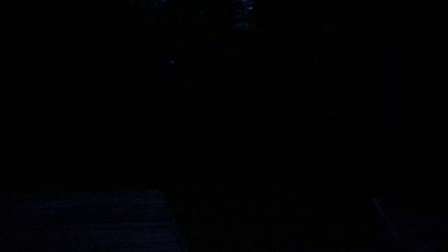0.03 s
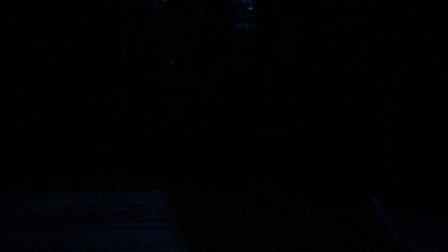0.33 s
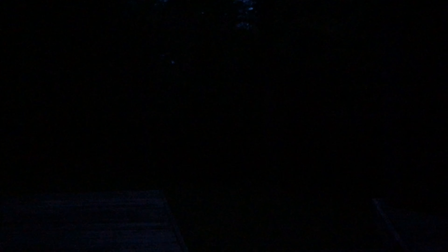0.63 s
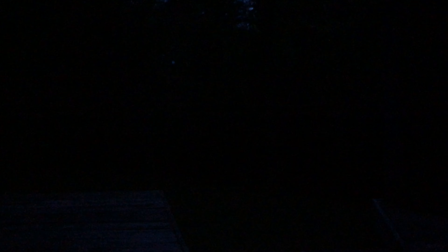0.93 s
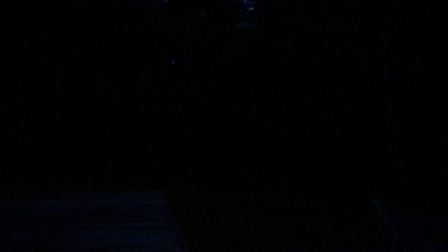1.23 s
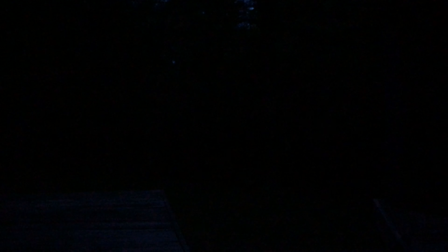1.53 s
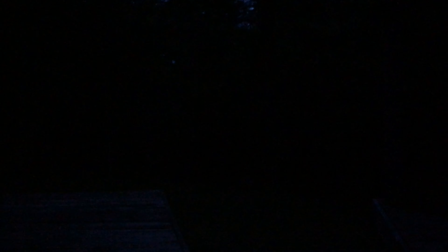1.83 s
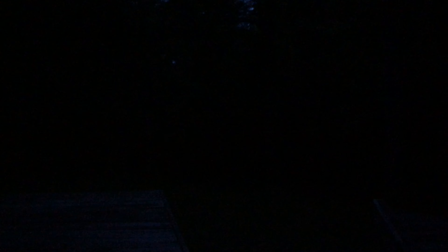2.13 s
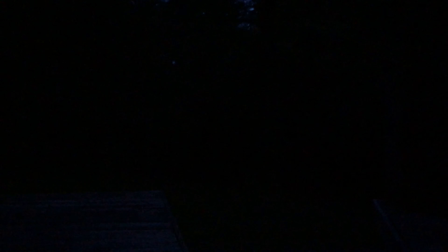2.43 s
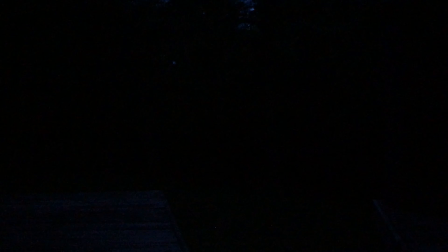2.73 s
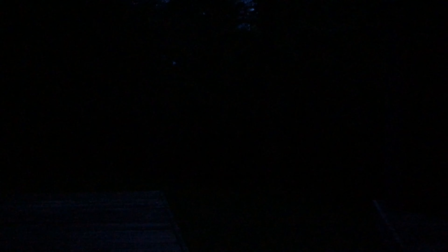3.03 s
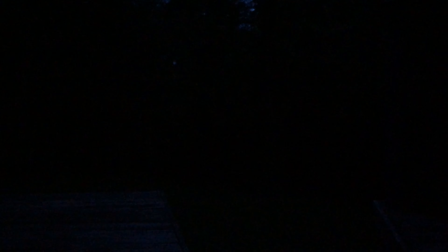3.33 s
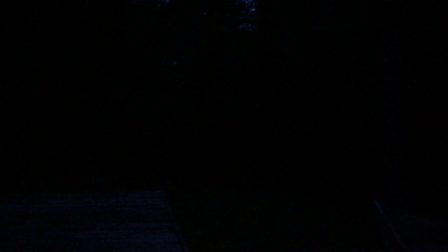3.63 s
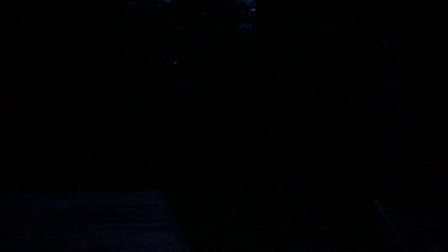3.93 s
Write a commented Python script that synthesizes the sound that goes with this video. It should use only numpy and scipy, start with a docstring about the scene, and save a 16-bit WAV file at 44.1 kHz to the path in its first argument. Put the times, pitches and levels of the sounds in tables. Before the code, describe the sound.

Many small frogs peep in high, overlapping rising whistles around a pond at night.

```python
"""Frog pond at night

A dense chorus of small frogs peeps. Each peep is a short rising whistle: the vocal sac radiates
the second harmonic of the larynx, the others stay faint. Trees scatter the calls. Behind them lie
faint rumble, hum and hiss, two far falling whistles and, near the end, one small metallic tick."""
import sys
import numpy as np
from scipy import signal
from scipy.fft import rfft, irfft
from scipy.io import wavfile
from scipy.ndimage import uniform_filter1d

SR = 44100
rng = np.random.default_rng(int(sys.argv[2]) if len(sys.argv) > 2 else 0)


def dump(signal):
    """Clip the signal to [-1, 1] and save it as 16-bit WAV at the path in sys.argv[1]."""
    limited = np.clip(np.atleast_2d(signal).T, -1, 1)
    pcm = np.round(limited * 32767).astype(np.int16)
    wavfile.write(sys.argv[1], SR, pcm)


N = 176400


def undb(db):
    """Decibels to gain."""
    return 10 ** (np.asarray(db) / 20)


def unit(x):
    """Scale to rms 1."""
    return x / np.sqrt(np.mean(x ** 2))


def add(out, start_s, x):
    """Mix x into out at start_s."""
    i = int(round(start_s * SR))
    a, b = max(i, 0), min(i + len(x), len(out))
    if b > a:
        out[a:b] += x[a - i:b - i]


def wander(rate_hz):
    """Smoothed random steps, spread near 1."""
    hold = int(SR / rate_hz)
    steps = rng.standard_normal(2000)[np.arange(N) // hold]
    return 1.3 * uniform_filter1d(uniform_filter1d(steps, hold), hold)


def noise(spectrum):
    """Noise of rms 1, shaped by (f/Hz, level/dB) points."""
    hz, db = np.array(spectrum).T
    bins_hz = np.maximum(np.arange(N // 2 + 1) * SR / N, 1)
    gain = undb(np.interp(np.log(bins_hz), np.log(hz), db))
    return unit(irfft(rfft(rng.standard_normal(N)) * gain, N))


# Night air spectrum: f/Hz, relative density/dB
AIR_SPECTRUM = [(20, -24.5), (32, -9.5), (45, 2.5), (60, -3), (90, 5.5), (135, -1), (200, 1), (270, -5),
                (400, -5.5), (580, -10), (740, -4.5), (1200, -12), (2000, -16.5), (3500, -25.5),
                (7000, -27.5), (15500, -31.5)]


def night_air(air_db=-66, hum_db=-70, hum_hz=112):
    """Faint rumble and hiss, with a low hum wavering in pitch and level."""
    pitch_hz = hum_hz * (1 + .02 * wander(14))
    hum = np.sqrt(2) * np.sin(2 * np.pi * np.cumsum(pitch_hz) / SR)
    air = undb(air_db) * noise(AIR_SPECTRUM)
    return air + undb(hum_db + 2 * wander(41)) * hum


def peep(length_s, mid_hz, harmonics_db, attack_s=.0065, rise_hz_per_s=2124, colour_db=0):
    """Gliding whistle on larynx harmonic 2, rasped by sac flutter; colour_db shifts the others."""
    release_s, bend_hz_per_s2 = .0086, -6000
    rasp_db, rasp_hz = -34.5, 444
    t = np.arange(int(length_s * SR)) / SR
    from_mid_s = t - length_s / 2
    waver = np.interp(t / length_s, np.linspace(0, 1, 24), rng.standard_normal(24))
    lowpass = signal.butter(4, rasp_hz, fs=SR, output="sos")
    flutter = unit(signal.sosfilt(lowpass, rng.standard_normal(SR // 5)))[:len(t)]
    glide_hz = mid_hz + rise_hz_per_s * from_mid_s + bend_hz_per_s2 * from_mid_s ** 2
    larynx_hz = glide_hz / 2 * (1 + .0012 * waver)
    phase = 2 * np.pi * (np.cumsum(larynx_hz) / SR + rng.random())
    attack = np.sin(np.pi / 2 * np.clip(t / attack_s, 0, 1))
    release = np.sin(np.pi / 2 * np.clip((length_s - t) / release_s, 0, 1))
    shift_db = colour_db + 2 * rng.standard_normal(len(harmonics_db))  # no two calls alike
    shift_db[1] = 0
    voice = sum(undb(db) * np.sin(k * phase) for k, db in enumerate(shift_db + harmonics_db, 1))
    return attack * release * (1 + undb(rasp_db) * flutter) * voice


def trees(call, echo_db, t60_s=.52, delay_s=.004, count=160):
    """Direct call plus its own scatter of echoes off trunks and banks."""
    spread, strength = rng.random(count), rng.standard_normal(count)
    lag_s = .5 * spread ** 2
    echoes = strength * undb(-60 * lag_s / t60_s) * np.sqrt(spread)
    response = np.zeros(SR * 3 // 4)
    taps = np.clip((delay_s + lag_s) * SR, 1, len(response) - 1).astype(int)
    response[taps] = undb(echo_db) * echoes / np.linalg.norm(echoes)
    response[0] = 1
    return signal.fftconvolve(call, response)


# Near larynx harmonics, first upward: relative level/dB
NEAR_LARYNX_DB = [-46.5, 0, -36, -38.5, -50.5, -56, -51.5, -44, -58.5, -68]
# Near peeps: t/s, length/s, mid f/Hz, rise/(Hz/s), relative level/dB, colour/dB, attack/s
NEAR_PEEPS = [(0,0.083,2850,2190,-32.5,2,0.0083), (.094,.08,2889,2430,-35,-9.5,0.0063),
              (.095,0.054,2817,3420,-33,-6,.006), (0.141,0.11,2702,2400,-42.5,-0.5,0.024),
              (0.185,0.091,2960,1410,-35.5,4.5,0.0052), (0.264,0.083,2920,1416,-36,1.5,0.013),
              (0.368,0.078,3032,2650,-33.5,8.5,0.015), (0.489,0.075,3161,2790,-34.5,-2.5,0.04),
              (.624,0.067,2830,2110,-37.5,0,0.0024), (.625,0.058,2972,1850,-34.5,-4.5,0.0035),
              (0.774,0.068,2917,2620,-31,-1,.025), (0.796,0.087,2861,2370,-35.5,4.5,0.049),
              (0.819,.065,2850,2750,-37.5,1.5,0.019), (0.928,0.079,2890,3760,-33.5,-3,.012),
              (1.024,0.083,3022,2350,-35.5,9.5,0.01), (1.055,0.086,2900,2750,-37.5,4.5,0.012),
              (1.115,0.093,2728,2670,-41,4.5,0.019), (1.182,0.062,3177,2990,-33.5,-1.5,0.013),
              (1.326,0.089,2947,2330,-34.5,-2.5,0.027), (1.39,.095,2955,2560,-37.5,-10,.02),
              (1.404,.08,3130,2370,-46.5,-9.5,0.021), (1.607,0.081,2972,2560,-34,7,.015),
              (1.699,0.061,2839,2190,-32,4,0.02), (1.778,0.084,2870,1980,-42,-6,0.0044),
              (1.825,0.096,2920,2870,-42,8.5,0.0037), (1.9,0.0743,2838,1980,-40.5,1,0.017),
              (1.977,0.063,3180,3200,-34,-2.5,0.025), (1.99,.082,2938,2630,-31,-1,0.039),
              (2.046,0.08,2688,1780,-41.5,4.5,0.017), (2.087,0.086,2945,1800,-39.5,-1.5,.004),
              (2.203,0.088,2977,2390,-32.5,6,0.024), (2.334,0.094,3014,2470,-40.5,6.5,.025),
              (2.492,.08,2963,3040,-39.5,-5,0.024), (2.556,.08,3157,2600,-49.5,-5,.02),
              (2.592,0.094,2940,2520,-33,2,0.0053), (2.692,.07,2833,1760,-33.5,2.5,.005),
              (2.719,0.084,2982,2000,-34,0.5,0.016), (2.735,0.068,3178,3040,-35.5,-0.5,0.021),
              (2.837,0.078,3004,2570,-33.5,5.5,0.027), (2.982,0.065,2956,1400,-35,5,0.013),
              (3.099,0.054,3004,2050,-37,-4.5,0.005), (3.149,.08,2722,1494,-44,-2.5,.012),
              (3.24,0.065,2820,2030,-34.5,-6.5,.004), (3.241,0.076,2913,2620,-37,0,0.0044),
              (3.251,0.057,2710,2370,-37,0.5,.015), (3.337,0.11,2934,3655,-35,-3.5,.03),
              (3.352,.07,2835,2610,-36,7,0.011), (3.462,0.079,3007,2390,-33.5,6.5,0.012),
              (3.583,0.079,3170,2560,-35,-1,0.045), (3.585,0.12,2903,2400,-37.5,5,0.0072),
              (3.697,0.087,2917,1240,-40,2,.025), (3.846,.08,3018,2240,-47.5,-8.5,0.032),
              (3.877,0.092,2982,2420,-38,2.5,0.04), (3.935,0.073,2826,2060,-33,-1,0.004)]


def near_frogs(gain_db=-.5):
    """Peeps that stand out, each with the echoes of its own place."""
    out = np.zeros(N)
    for start_s, length_s, hz, rise_hz_per_s, db, colour_db, attack_s in NEAR_PEEPS:
        call = peep(length_s, hz, NEAR_LARYNX_DB, attack_s, rise_hz_per_s, colour_db)
        add(out, start_s, undb(db + gain_db) * trees(call, echo_db=-3.5))
    return out


# Far larynx harmonics, first upward: relative level/dB
FAR_LARYNX_DB = [-39.5, -3, -34, -41.5, -50.5, -56, -55.5, -46.5, -68, -66]


def far_frogs(count=32, rms_db=-40, scatter_db=2.05, gap_s=.62, centre_hz=2927.6, spread_hz=155):
    """Distant crowd, each frog repeating its peep at its own pitch and pace."""
    out = np.zeros(N)
    for frog, turn in enumerate(rng.permutation(count)):
        hz = centre_hz + spread_hz * np.arcsin((2 * frog + 1) / count - 1)  # densest at the centre
        pace, loudness = rng.standard_normal(2)
        calls = np.zeros(N + SR)  # 1 s lead-in
        for k, (late, sharp, accent) in enumerate(rng.standard_normal((9, 3))):
            start_s = gap_s * ((k + turn / count) * (1 + .02 * pace) + .03 * late)
            call = peep(length_s=.085, mid_hz=hz + 12 * sharp, harmonics_db=FAR_LARYNX_DB)
            add(calls, start_s, undb(scatter_db * (loudness + accent) / 2) * call)
        out += trees(calls, echo_db=3)[SR:SR + N]
    return undb(rms_db) * unit(out)


# Peep onset clicks: t/s, level/dB
ONSET_CLICKS = [(.3706, -64), (1.028, -69), (1.604, -72), (1.6994, -66), (2.2034, -65), (2.838, -67),
                (3.4644, -67)]
# Click spectrum: f/Hz, relative density/dB
CLICK_SPECTRUM = [(800, -9), (2000, -7.5), (5000, 0.5), (8500, -3.5), (11000, -11), (15000, -18)]


def onset_clicks(decay_s=.0033):
    """Soft dry clicks with which the closest frogs start their peeps."""
    out, t = np.zeros(N), np.arange(SR // 20) / SR
    for start_s, db in ONSET_CLICKS:
        add(out, start_s, undb(db) * np.exp(-t / decay_s) * noise(CLICK_SPECTRUM)[:len(t)])
    return out


# Raspy larynx harmonics, first upward: relative level/dB
RASPY_LARYNX_DB = [-22.5, 3, -1, -5.5, -10, -12, -10.5, -4.5, -9, -17.5]
# Raspy peeps: t/s, echo level/dB
RASPY_PEEPS = [(0.811, -72), (1.969, -76), (2.71, -73.5), (3.58, -70)]


def raspy_frog(echo_db=11.5):
    """A frog rich in overtones, heard mostly as echoes off the trees."""
    out = np.zeros(N)
    for start_s, db in RASPY_PEEPS:
        call = peep(length_s=.067, mid_hz=2990, harmonics_db=RASPY_LARYNX_DB)
        add(out, start_s, undb(db - echo_db) * trees(call, echo_db))
    return out


# Falling calls: t/s, length/s, mid f/Hz, relative level/dB
FALLING_CALLS = [(1.307, 0.12, 2345, -71), (1.88, 0.12, 2376, -72)]


def falling_calls():
    """Two faint downward whistles far off, pitched below the chorus."""
    out = np.zeros(N)
    for start_s, length_s, hz, db in FALLING_CALLS:
        call = peep(length_s, hz, FAR_LARYNX_DB, attack_s=length_s / 3, rise_hz_per_s=-1400)
        add(out, start_s, undb(db) * trees(call, echo_db=3))
    return out


# Bump spectrum: f/Hz, relative density/dB
BUMP_SPECTRUM = [(20, -12), (45, -1), (100, -4), (250, -21), (2000, -71)]


def bump(peak_s=1.6, width_s=.037, level_db=-64.5):
    """A brief, soft swell of rumble."""
    t = np.arange(N) / SR
    swell = np.exp(-((t - peak_s) / width_s) ** 2)
    return undb(level_db) * swell * noise(BUMP_SPECTRUM)


# Metal modes: f/Hz, level/dB, T60/s
METAL_MODES = [(8876, -53, .06), (9027, -49, .04), (12114, -55, .1), (15492, -39, .032), (15500, -70, .35),
               (15808, -66, .06)]
# Tap spectrum: f/Hz, relative density/dB
TAP_SPECTRUM = [(2000, -22), (4500, -5), (7000, 1), (9000, 15), (11000, 2), (13500, -13), (15500, -9)]


def metal_tick(start_s=3.9025, tap_db=-43.5, tap_decay_s=.0032):
    """A tiny metal part is tapped and rings very high."""
    out, t = np.zeros(N), np.arange(SR // 4) / SR
    ring = sum(undb(db - 60 * t / t60_s) * np.sin(2 * np.pi * hz * t) for hz, db, t60_s in METAL_MODES)
    tap = undb(tap_db) * np.exp(-t / tap_decay_s) * noise(TAP_SPECTRUM)[:len(t)]
    add(out, start_s, ring + tap)
    return out


def scene():
    """Mono mix of background, calls and tick."""
    background = night_air() + bump()
    calls = far_frogs() + near_frogs() + raspy_frog() + falling_calls() + onset_clicks()
    return (background + calls + metal_tick())[None]


def record(dry):
    """Steep low-pass on the top treble."""
    cutoff_hz = 15800
    return signal.sosfilt(signal.ellip(12, .1, 80, cutoff_hz, fs=SR, output="sos"), dry)


dry = scene()
out = record(dry)
dump(out)
```